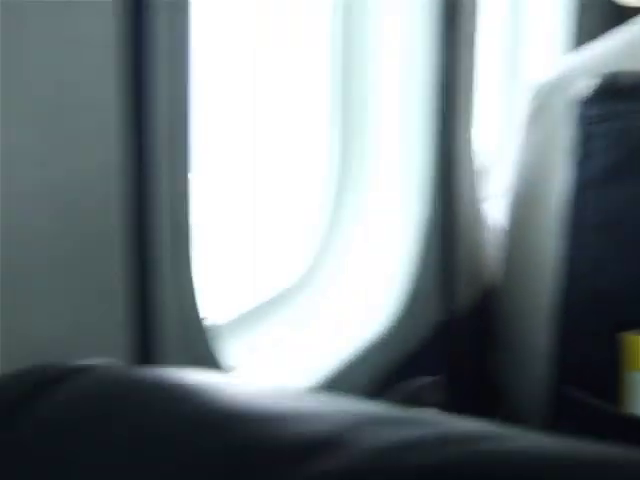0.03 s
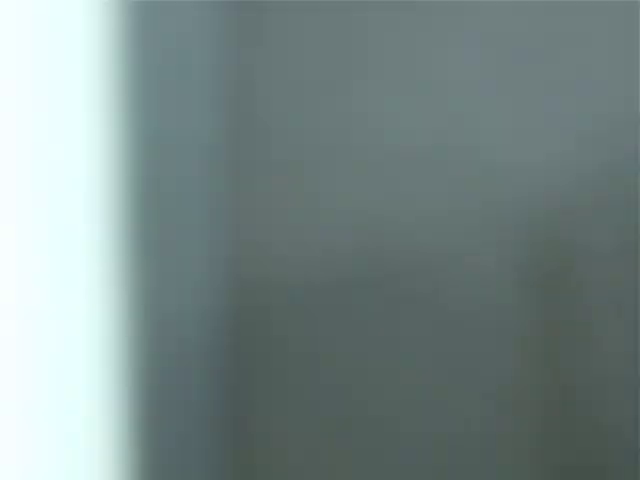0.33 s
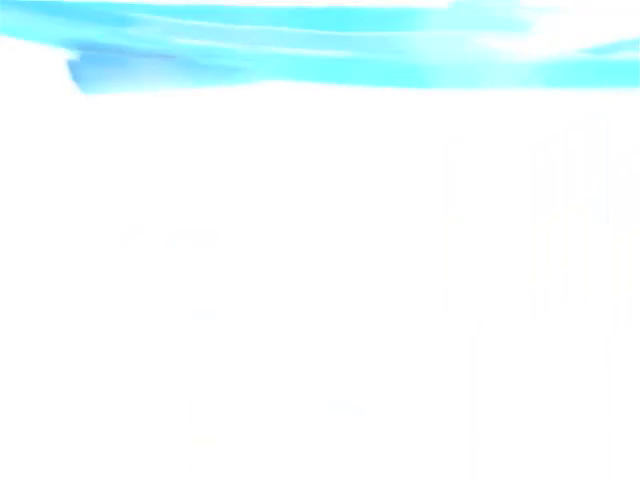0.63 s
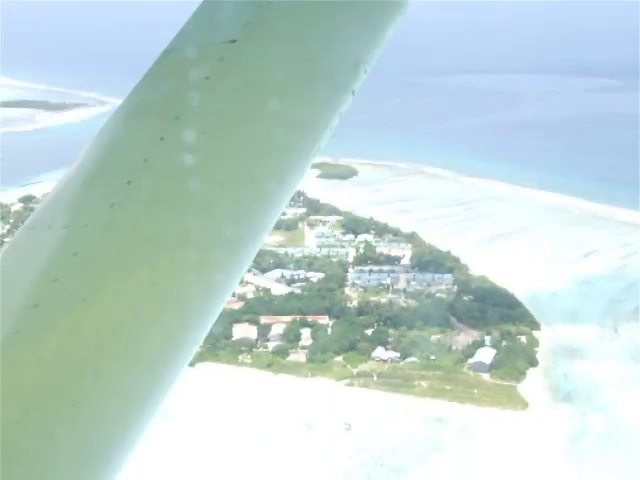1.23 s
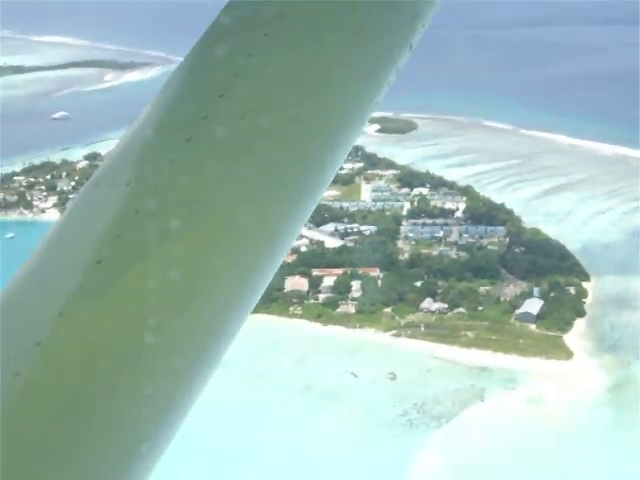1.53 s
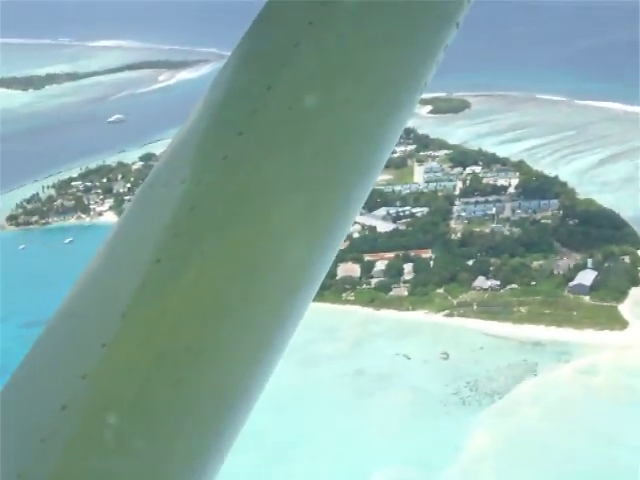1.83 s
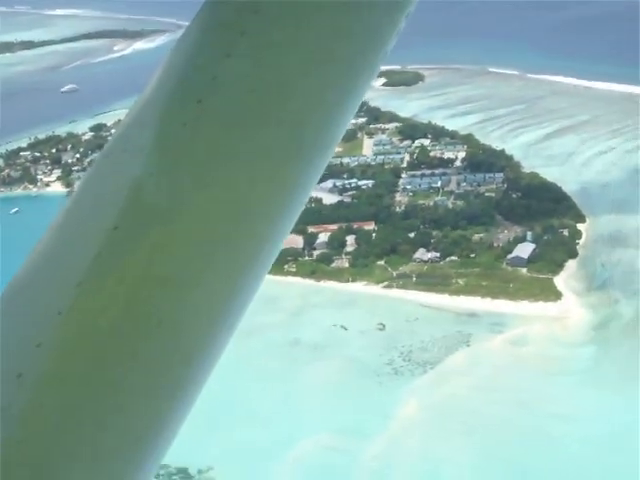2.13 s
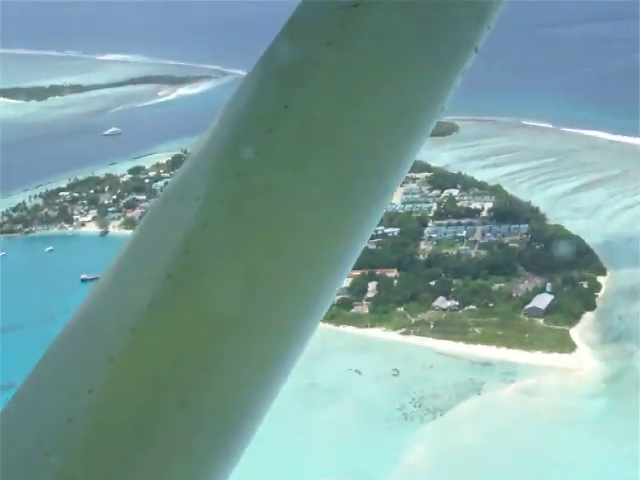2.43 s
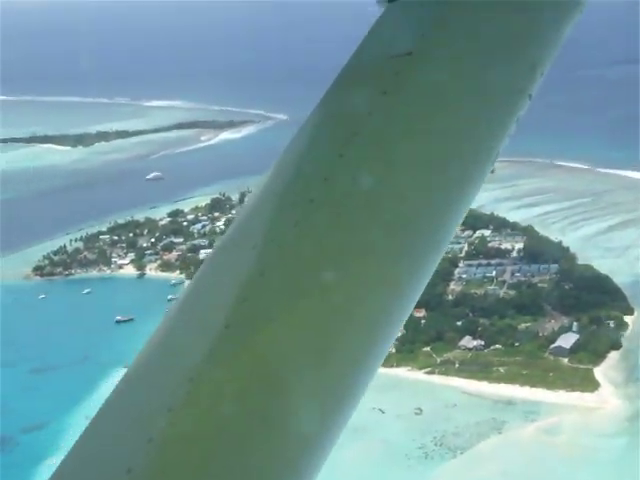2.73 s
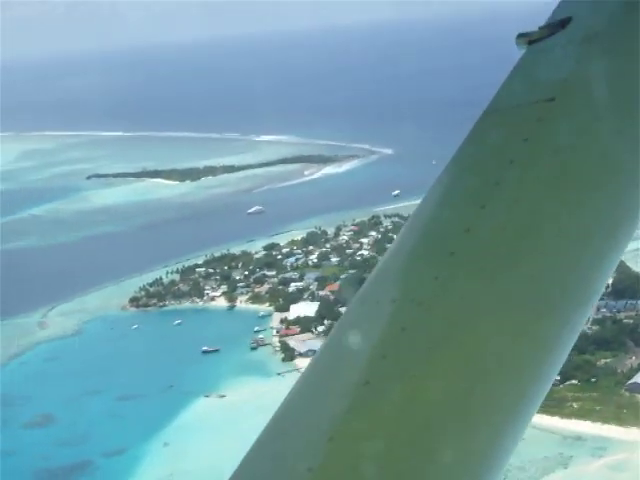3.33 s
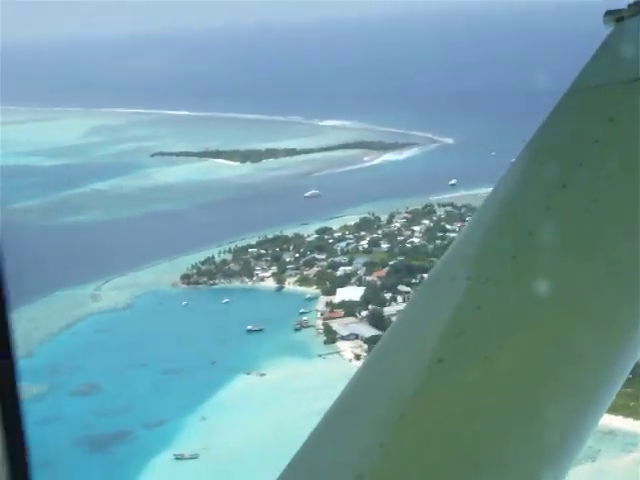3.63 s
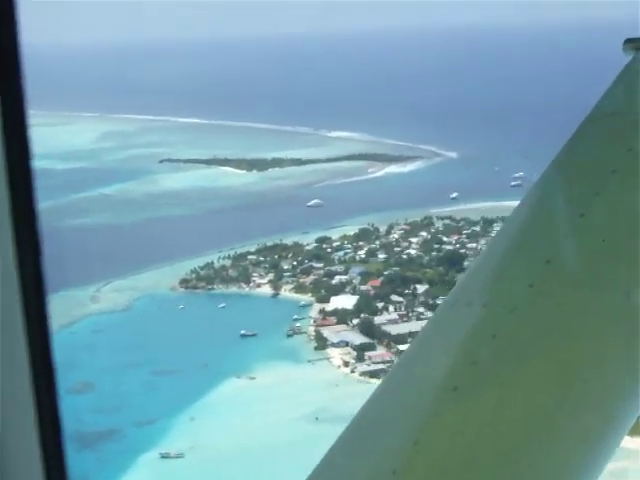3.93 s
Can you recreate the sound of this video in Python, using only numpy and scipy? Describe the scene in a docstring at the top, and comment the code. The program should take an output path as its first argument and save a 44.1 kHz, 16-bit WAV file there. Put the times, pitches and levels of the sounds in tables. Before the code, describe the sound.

A small propeller plane drones with a deep, steady hum for all four seconds, heard inside the cabin over low rumble and hissing air. The engine roar swells a little between about 1 and 2 seconds. From around 2 seconds, as the microphone faces a side window, the air sounds softer and hollower. A faint whine surfaces near 1 second and again from 3.5 seconds.

```python
"""A deep, steady hum fills the cabin of a small propeller aircraft in level flight. The passing blades
beat it out, over the rumble of the airframe, the boom of the walls, the roar of the engines, the hiss
of the slipstream and a faint whine. The microphone turns from the cabin to a side window, so the
overtones swell and fade and the rush of air grows hollow."""
import sys
import numpy as np
from scipy import signal
from scipy.fft import rfft, irfft
from scipy.io import wavfile
from scipy.ndimage import uniform_filter1d

SR = 44100
rng = np.random.default_rng(int(sys.argv[2]) if len(sys.argv) > 2 else 0)


def file_out(sig):
    """Save sig as 16-bit WAV at sys.argv[1]."""
    # one column per channel
    cols = np.atleast_2d(sig).T
    # limit, then scale
    lim = np.clip(cols, -1, 1)
    pcm = np.round(lim * 32767).astype(np.int16)
    wavfile.write(sys.argv[1], SR, pcm)


N = 176400

# Each row: time in seconds, blade-pass frequency in Hz.
BLADE_RATE = [(0, 82.4), (1, 82.89), (1.8, 82.88), (2.8, 82.83), (4, 83.04)]
# The hum and its octave along the microphone's path. Each row: time in seconds, level in dB.
HUM_LEVEL = [(0, -13.8), (.42, -14.5), (.56, -12.5), (.67, -15.5), (.76, -13), (1.03, -14.3), (1.12, -15),
             (1.22, -14), (1.31, -16.5), (1.41, -13.6), (1.52, -17.5), (1.62, -13.5), (2.5, -12.5),
             (2.95, -12), (3.1, -13.4), (3.27, -13), (3.55, -13.5), (4, -14)]
OCTAVE_LEVEL = [(0, -22.5), (.4, -21.5), (.75, -23.3), (1.05, -27.5), (1.35, -25), (1.65, -21), (2.1, -20),
                (2.55, -28.5), (2.85, -31), (3.05, -30.5), (3.25, -25), (3.6, -24.5), (4, -24.5)]
# Weak upper blade tones. Each row: harmonic number, level in dB in the cabin, level in dB at the window.
OVERTONES = [(3, -38, -38.5), (4, -43.5, -44), (5, -44.5, -41.5), (6, -49.5, -56), (7, -56, -52.5),
             (9, -55, -50.5), (11, -56.5, -54.5)]
# Where the microphone points. Each row: time in seconds, position from 0 (cabin) to 1 (window).
FACING = [(0, 0.19), (.45, 0), (.8, .35), (1.2, .18), (1.7, 0.21), (2.35, .85), (3.4, 0.88), (4, 0.91)]
# Spectra of airframe, cabin walls and engines. Each row: frequency in Hz, relative density in dB.
RUMBLE_SPECTRUM = [(10, -19), (24, -8.5), (38, -1), (52, -7), (68, -5), (90, 1.5), (112, -2.5), (135, -7.5),
                   (170, -13), (230, -23.5), (600, -72)]
BOOM_SPECTRUM = [(60, -31), (100, -2.5), (140, -5), (185, -2), (218, .5), (245, 0.5), (270, -4.5),
                 (300, -16), (400, -40), (900, -79.5)]
ROAR_SPECTRUM = [(200.0, -36), (280.0, -1), (320.0, -3), (380.0, 2.9), (415.0, -2.5), (455.0, -9.5),
                 (560.0, -14.5), (720.0, -9), (820.0, -15.5), (905.0, -10), (970.0, -29.5), (1500.0, -69.5)]
# The slipstream in the cabin and at the window. Each row: frequency in Hz, relative density in dB.
CABIN_AIR_SPECTRUM = [(200.0, -23), (420.0, 2), (520.0, 3.5), (600.0, -0.1), (800.0, -2), (1100.0, -5),
                      (1250.0, -0.8), (1700.0, -1.6), (2200.0, -4), (3150.0, -7.5), (3950.0, -6),
                      (5600.0, -8), (7200.0, -7.5), (7900.0, -11.5), (8500.0, -23.5), (9000.0, -37)]
WINDOW_AIR_SPECTRUM = [(200.0, -25.5), (420.0, 0.2), (650.0, -1.8), (880.0, -1), (1000.0, -9.5),
                       (1170.0, -11.5), (1300.0, -5), (1650.0, -10.5), (1830.0, -12.5), (2500.0, -10.8),
                       (3050.0, -15), (4000.0, -11.5), (5300.0, -14), (6900.0, -13), (7750.0, -16.5),
                       (8400.0, -27.5), (9000.0, -41)]
# Resonances near the window. Each row: centre in Hz, half width in Hz, boost in dB.
WINDOW_RESONANCES = [(905, 35, 1.5), (1432, 71, 5), (2020, 74, 5.5), (2260, 115, 6.5)]
# Envelopes of boom, roar, slipstream treble (before trim) and whine. Each row: time in seconds, level in dB.
BOOM_LEVEL = [(0, -33), (.5, -27.5), (1, -26.5), (1.22, -23), (1.5, -24.8), (2, -29.8), (2.5, -32.5),
              (3.1, -30), (4, -28.8)]
ROAR_LEVEL = [(0, -38.5), (.3, -39.5), (.8, -34.7), (1.4, -29.7), (1.9, -30), (2.4, -33.5), (3.2, -35.5),
              (4, -34)]
TREBLE_LEVEL = [(0.0, -33.6), (0.48, -34), (0.95, -37.0), (1.16, -35), (1.5, -36), (1.65, -35.5),
                (2.1, -37.4), (2.3, -38.7), (2.37, -42), (2.46, -39.5), (3.2, -39.1), (3.6, -40),
                (4.0, -38.5)]
WHINE_LEVEL = [(0.0, -52), (0.9, -45), (1.6, -56), (2.4, -62), (3.0, -59.5), (3.5, -47.5), (4.0, -43.5)]

FLUTTER_HZ, HUM_FLUTTER_DB, OVERTONE_FLUTTER_DB, JITTER_TURNS = 8.3, 0.09, 2.2, .002
PATCH_S, PATCH_HZ, AIR_PATCH_DB = .08, 300, 1.04
FRAME, HOP = 2048, 512
T = np.arange(N) / SR
BINS = np.fft.rfftfreq(FRAME, 1 / SR)
FRAME_T = np.arange(N // HOP + 3) * HOP / SR


def amp(db):
    """Amplitude grows tenfold with every 20 dB."""
    return 10 ** (np.asarray(db) / 20)


def unit(x):
    """Normalisation to an rms of 1."""
    return x / np.sqrt(np.mean(x ** 2) + 1e-20)


def curve(rows, t=T):
    """Linear interpolation of a table over time."""
    return np.interp(t, *np.transpose(rows))


def spectrum_db(rows):
    """Interpolation of a spectrum in dB on a log-frequency axis."""
    hz, db = np.transpose(rows)
    return np.interp(np.log(BINS + 1), np.log(hz + 1), db)


def wander(rate_hz):
    """Low-pass filtering turns white noise into a slow fluctuation of rms 1."""
    hz = np.fft.rfftfreq(N, 1 / SR)
    low_pass = np.exp(-(hz / rate_hz) ** 2) * (hz > 0)
    return unit(irfft(rfft(rng.standard_normal(N)) * low_pass, N))


def turbulence(gain, patch_db):
    """Random phases give noise of rms 1; its spectrum follows gain, in drifting patches of strength."""
    real, imag, patches = rng.standard_normal((3, len(FRAME_T), len(BINS)))
    patches = uniform_filter1d(patches, round(PATCH_S * SR / HOP), axis=0)
    patches = unit(uniform_filter1d(patches, round(PATCH_HZ * FRAME / SR), axis=1))
    spectra = (real + 1j * imag) * gain * amp(patch_db * patches)
    _, noise = signal.istft(spectra.T, nperseg=FRAME, noverlap=FRAME - HOP)
    return unit(noise[:N])


def propeller(blade_cycles):
    """Periodic blade pulses form a harmonic series, each partial fluttering in the uneven air."""
    tones = np.zeros(N)
    for harmonic, envelope in [(1, HUM_LEVEL), (2, OCTAVE_LEVEL)]:
        level = curve(envelope) + HUM_FLUTTER_DB * wander(FLUTTER_HZ)
        tones += amp(level) * np.cos(2 * np.pi * harmonic * blade_cycles)
    facing = curve(FACING)
    for harmonic, cabin_db, window_db in OVERTONES:
        level = cabin_db + (window_db - cabin_db) * facing + OVERTONE_FLUTTER_DB * wander(FLUTTER_HZ)
        tones += amp(level) * np.cos(2 * np.pi * (harmonic * blade_cycles + rng.random()))
    return np.sqrt(2) * tones  # rms to peak amplitude


def airframe_and_engines(rumble_db=-29):
    """Incoherent sources add in power: steady airframe rumble, booming cabin walls, roaring engines."""
    layers = [(RUMBLE_SPECTRUM, rumble_db),
              (BOOM_SPECTRUM, curve(BOOM_LEVEL)),
              (ROAR_SPECTRUM, curve(ROAR_LEVEL))]
    return sum(amp(db) * turbulence(amp(spectrum_db(rows)), patch_db=0.87) for rows, db in layers)


def slipstream(blade_cycles, trim_db=-0.08, chop_depth=0.027):
    """Turbulent air makes broadband noise, modulated by the blades and hollowed by window resonances."""
    facing = curve(FACING, FRAME_T)[:, None]
    hollow_db = sum(db * np.exp(-((BINS - hz) / width) ** 2) for hz, width, db in WINDOW_RESONANCES)
    window_db = spectrum_db(WINDOW_AIR_SPECTRUM) + hollow_db
    gain = amp((1 - facing) * spectrum_db(CABIN_AIR_SPECTRUM) + facing * window_db)
    # Hold the treble at unit power, so that its envelope sets the level of the whole rush.
    treble = (BINS > 2500) & (BINS < 8000)
    gain /= np.linalg.norm(gain[:, treble], axis=1)[:, None]
    full_band_rms = np.sqrt(np.mean(np.sum(gain ** 2, axis=1)))
    rush = full_band_rms * turbulence(gain, AIR_PATCH_DB)
    chop = 1 + chop_depth * np.cos(2 * np.pi * blade_cycles)
    return rush * amp(curve(TREBLE_LEVEL) + trim_db) * chop


def whine(centre_hz=1080, half_width_hz=55):
    """Noise confined to a narrow band is heard as a breathy pitch; this one comes and goes."""
    band = np.exp(-((BINS - centre_hz) / half_width_hz) ** 2)
    return amp(curve(WHINE_LEVEL)) * turbulence(band, AIR_PATCH_DB)


def scene():
    """The sources superpose at one point; the hum and the chopping of the air share the blade phase."""
    blade_cycles = np.cumsum(curve(BLADE_RATE)) / SR + JITTER_TURNS * wander(FLUTTER_HZ)
    cabin = propeller(blade_cycles) + airframe_and_engines() + slipstream(blade_cycles) + whine()
    return cabin[None]


def record(dry):
    """A linear-phase low-pass filter removes the treble above 8750 Hz."""
    taps = signal.firwin(401, 8750, window=("kaiser", 9), fs=SR)
    return signal.oaconvolve(dry, taps[None], "same")


dry = scene()
out = record(dry)
file_out(out)
```